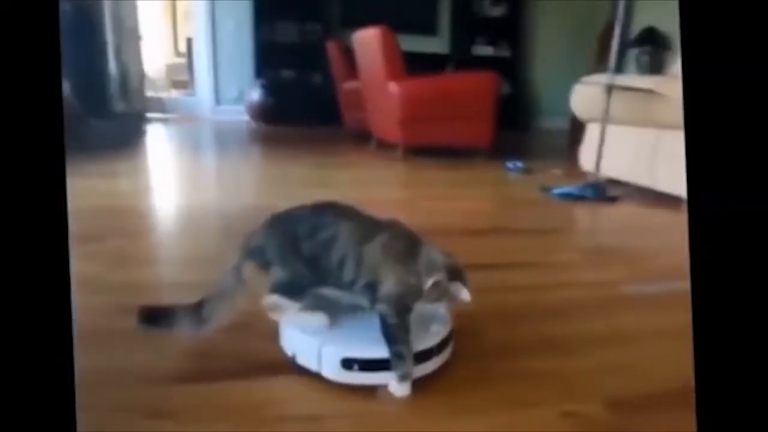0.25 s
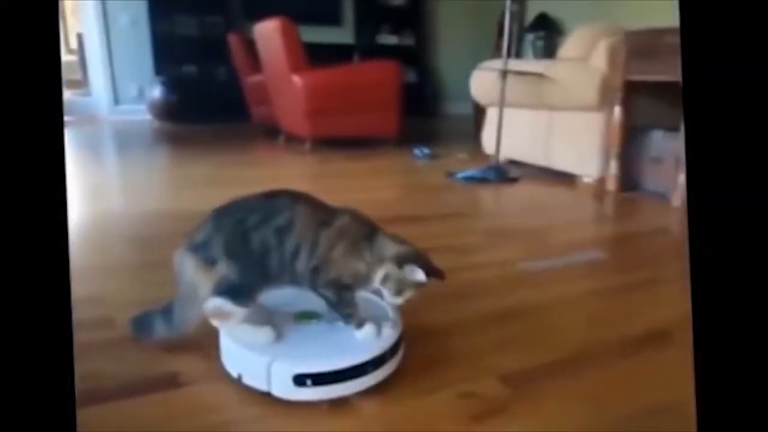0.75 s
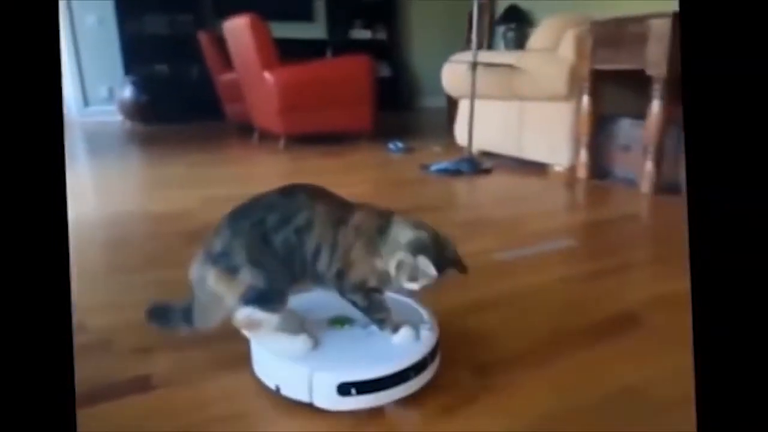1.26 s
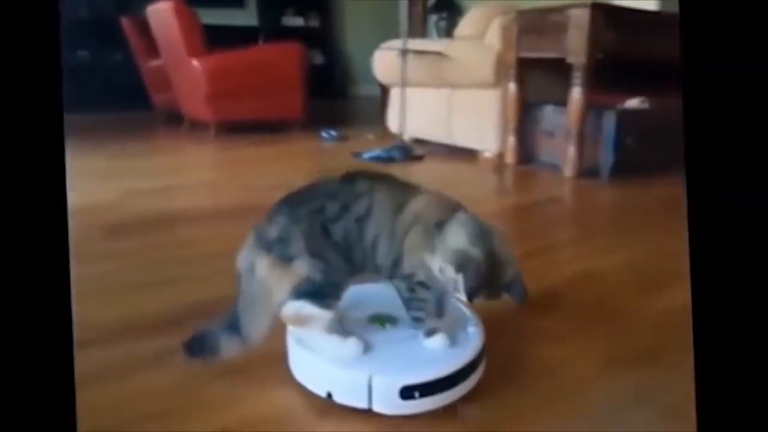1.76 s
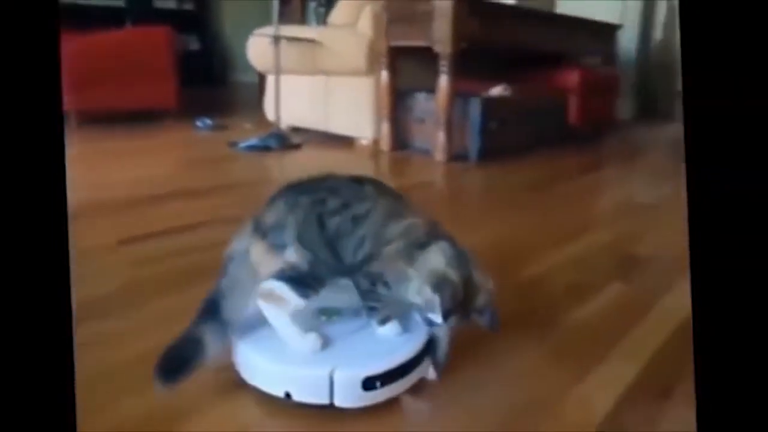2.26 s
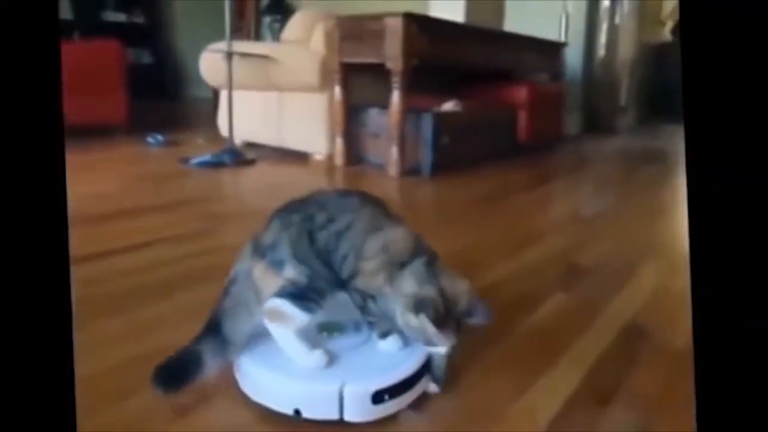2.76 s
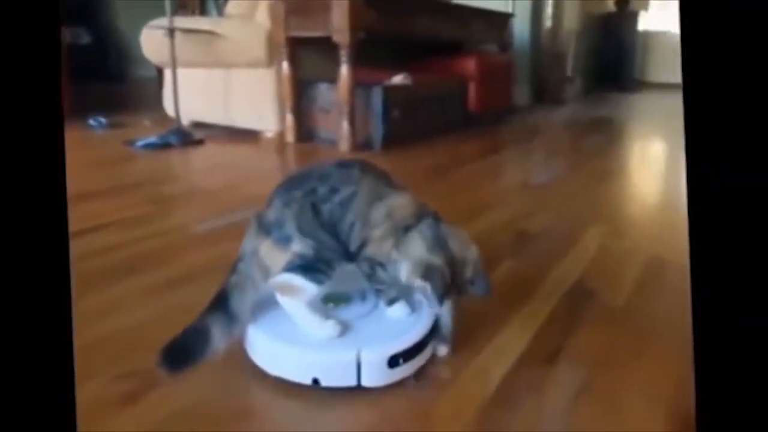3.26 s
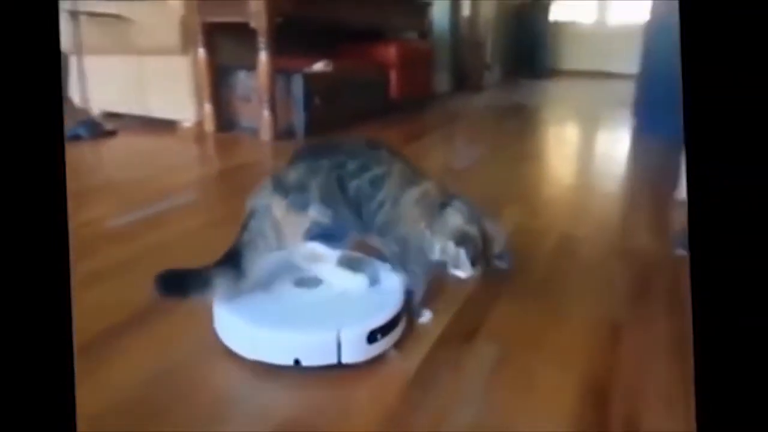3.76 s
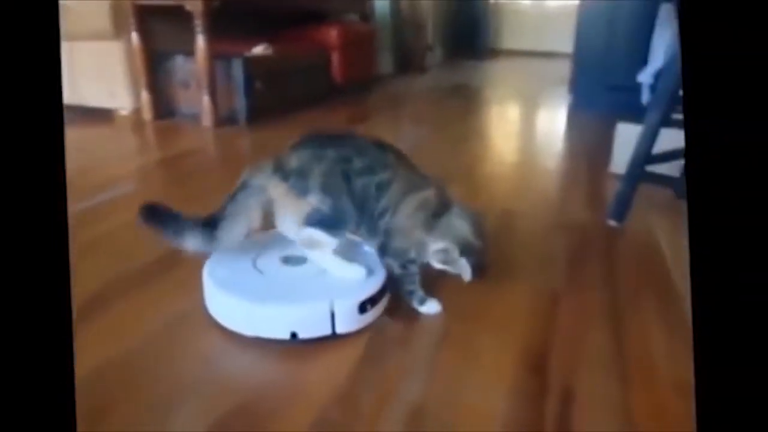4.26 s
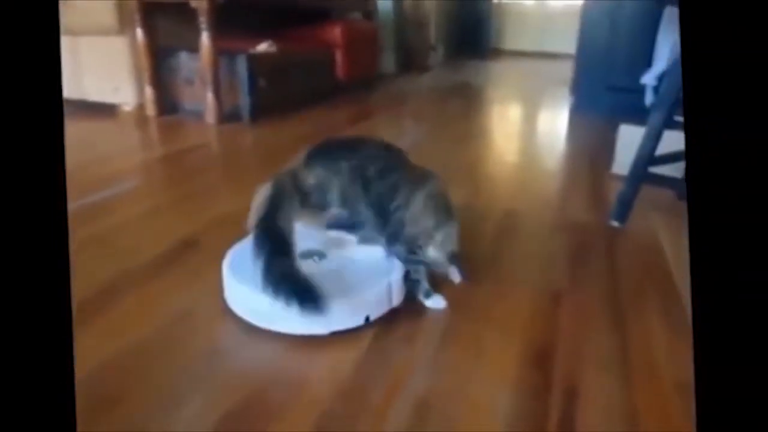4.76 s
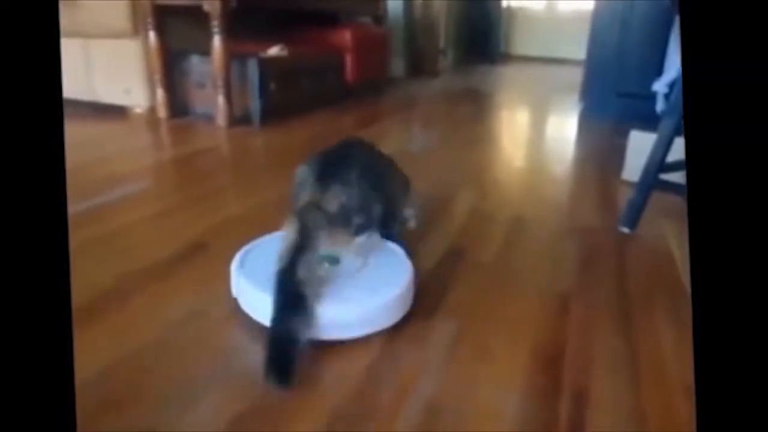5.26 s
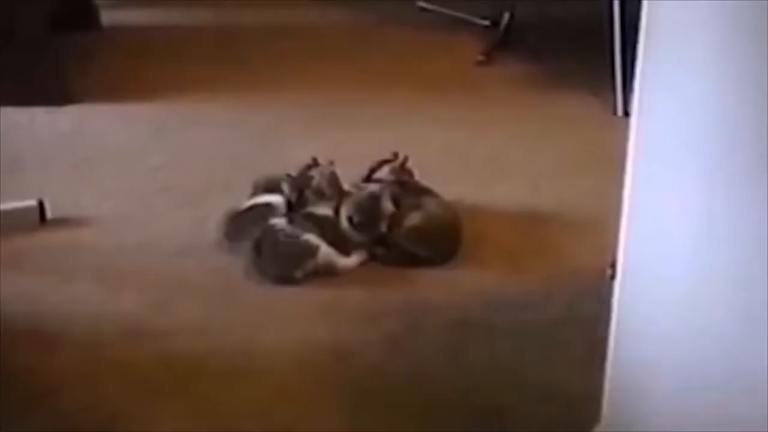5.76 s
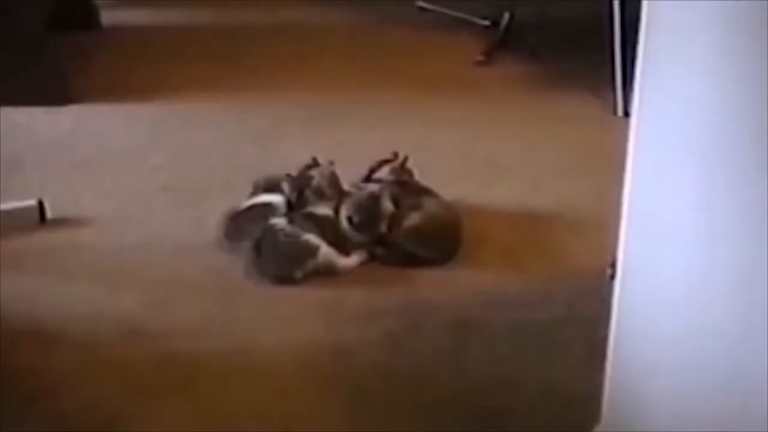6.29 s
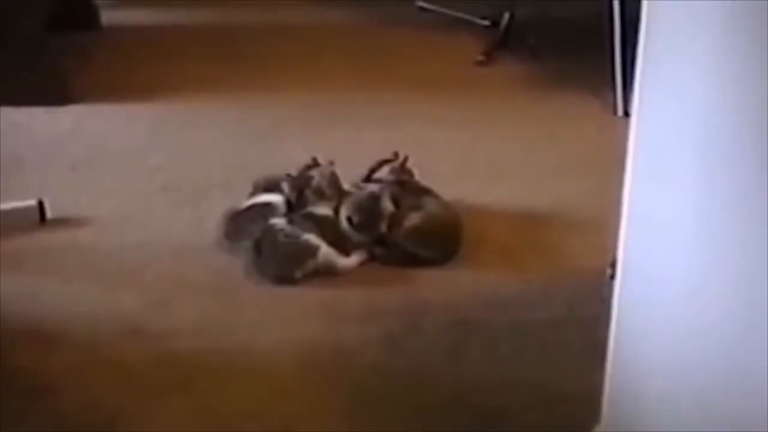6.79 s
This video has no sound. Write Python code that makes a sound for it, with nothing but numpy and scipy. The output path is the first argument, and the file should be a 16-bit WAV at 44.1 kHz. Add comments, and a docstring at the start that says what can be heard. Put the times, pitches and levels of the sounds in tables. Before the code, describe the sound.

A robot vacuum whirs close by on a wooden floor, its brush whining and rattling, nearly jamming, breaking free, then stopping dead into silence.

```python
"""A robot vacuum drives and turns on a wooden floor, close by: bladed-fan tone over turbulent air and wheel
rumble. From the start a geared brush motor sings and rattles, throbbing once per brush turn; shell knocks and
scuffs recur. Early and midway snags drag the brush down; near 4.8 s it slows almost to a jam, then breaks free
at 4.97 s. Five tiny skips occur along the way. Near 5.83 s the level dips briefly; at 6.12 s the sound stops,
leaving a settling offset over a faint electrical floor."""
import sys
import numpy as np
from scipy import signal
from scipy.fft import rfft, irfft, next_fast_len
from scipy.io import wavfile
from scipy.ndimage import uniform_filter1d, map_coordinates

SR = 44100
rng = np.random.default_rng(int(sys.argv[2]) if len(sys.argv) > 2 else 0)


def put_to_file(sound):
    """Save the sound as 16-bit audio at rate SR, in the file named by the first command-line argument."""
    columns = np.atleast_2d(sound).T  # one column per channel
    safe = np.clip(columns, -1, 1)
    whole_steps = np.round(safe * 32767)
    wavfile.write(sys.argv[1], SR, whole_steps.astype(np.int16))


N = 310106
T = np.arange(N) / SR  # time/s

BLADES = 7
# shaft speed of the suction fan: t/s, f/Hz
FAN_SHAFT_SPEED = [(0, 252), (.6, 254.7), (1.9, 254.5), (2.6, 252.3), (3.7, 253.3), (4.7, 252.7),
                   (5.2, 252.2), (6.1, 251.5)]
# blade tone, swelling and fading as the robot crosses the room's standing waves: t/s, level/dB
BLADE_TONE_LEVEL = [(0, -31.5), (.17, -32.5), (.55, -29.5), (.68, -38.5), (1.25, -42.5), (1.85, -38),
                    (2.4, -37.5), (2.62, -31.5), (3.5, -31), (4.03, -39), (4.25, -34), (4.8, -40.5),
                    (5.07, -35.5), (5.2, -44.5), (5.828, -42), (5.842, -31), (6.1, -30)]
# nodes of those waves, where the tone nearly vanishes: t/s, half length to 1/e /s, depth/dB
STANDING_WAVE_NODES = [(0, 0.065, 17), (.37, 0.052, 13.5), (1.33, 0.07, 15), (2.53, 0.052, 16)]
# the fan's other strong tones: t/s, hum level/dB, blade overtone level/dB
HUM_AND_OVERTONE = [(0, -45, -45.5), (1.1, -53, -71), (2.2, -58, -47.5), (3.6, -56, -49), (4.3, -52.5, -47),
                    (4.7, -50, -50), (5.2, -46, -48.5), (6.1, -46.5, -50.5)]
# faint lines from imbalance: multiple of the shaft rate, level/dB
IMBALANCE_LINES = [(3, -55), (4, -55), (5, -56), (6, -54.5), (8, -55.5)]


def fan(wobble=0.00045, flutter_db=0.92, line_flutter_db=1.5):
    """Blade-passing tone: seven blades sound at seven times the shaft rate; imbalance adds other multiples."""
    shaft_hz, = curves(FAN_SHAFT_SPEED)
    hum_db, overtone_db = curves(HUM_AND_OVERTONE)
    blade_db, = curves(BLADE_TONE_LEVEL)
    blade_db = blade_db - swells(STANDING_WAVE_NODES) + flutter_db * walk(34)
    angle = 2 * np.pi * np.cumsum(shaft_hz * (1 + wobble * walk(25))) / SR
    tones = undb(blade_db) * np.sin(BLADES * angle)
    tones += undb(hum_db) * np.sin(2 * angle)
    tones += undb(overtone_db + line_flutter_db * walk(2.5)) * np.sin(2 * BLADES * angle)
    for order, db in IMBALANCE_LINES:
        tones += undb(db + line_flutter_db * walk(2.9)) * np.sin(order * angle)
    return np.sqrt(2) * tones  # the levels are rms


# below this shaft speed the brush sticks and slips on the floor
STICK_HZ = 111
# a snag that takes more speed than this chokes the gear whine, by this many dB per further Hz
CHOKE_HZ, CHOKE_DB_PER_HZ = 3.5, 2.2
# gear whine: t/s, level/dB, throb with each brush turn/dB
WHINE_LEVEL = [(0, -37.5, 1), (.28, -38, -3), (.4, -40, 0), (.6, -40, -0.5), (1.15, -36, -1),
               (1.7, -38.5, 1.5), (2.15, -38, 0), (2.45, -47.5, 7), (3.2, -45.5, 2), (4.1, -47, 6),
               (4.68, -46, -4), (4.76, -37, -0.5), (4.88, -45.5, 4.5), (5.1, -52.5, 2), (5.35, -43.5, -1),
               (5.55, -70.5, 0.5)]
# whine of the 36-tooth gear with its sidebands: multiple of the shaft rate, relative level/dB
TOOTH_LINES = [(34, -9.5), (35, -14.5), (36, 3.5), (37, -13.5), (38, -13)]
# strength of the lower motor whirr: t/s, level/dB
WHIRR_LEVEL = [(0, -42), (3.8, -44), (4.7, -46.5), (5.2, -59), (6.1, -47.5)]
# lines of that whirr: multiple of the shaft rate, relative level/dB
MOTOR_LINES = [(9, -5), (15, -7.5), (18, -3.5), (27, -16), (28, -17)]
# gearbox resonances: f/Hz, nominal width/Hz (scaled in resonances), relative level/dB
GEARBOX_MODES = [(1648, 430, -3), (2003, 64, 2.5), (2724, 410, -7), (3223, 145, 3.5), (3583, 150, 1.5),
                 (3810, 360, 0.5), (4126, 150, -0.5)]


def brush_gear(rattle_db, jitter=.0011, sway=.0012, clatter=0.17, whine_flutter_db=0.87,
               rattle_snag_db=0.5, rattle_surge_db=0.23, whirr_load_db=0.4, room_share=0.28):
    """Gear meshing: teeth sing at multiples of the shaft rate; rattle is noise modulated once per shaft turn."""
    shaft_hz, turn = brush_motor()
    whine_db, throb_db = curves(WHINE_LEVEL)
    whirr_db, = curves(WHIRR_LEVEL)
    # bristle drag keeps the speed slightly uneven; a slowed brush judders
    judder_hz = .75 * np.clip((STICK_HZ - shaft_hz) / 4, 0, 1) * walk(45)
    uneven_hz = shaft_hz * (1 + jitter * walk(90) + sway * walk(18))
    angle = 2 * np.pi * np.cumsum(judder_hz + uneven_hz) / SR

    # slowed down the motor whirrs more; a snag turns song into rattle
    surge_hz = shaft_hz - uniform_filter1d(shaft_hz, SR // 5)
    snag_hz = swells(SPEED_SNAGS)
    choke_db = CHOKE_DB_PER_HZ * np.maximum(snag_hz - CHOKE_HZ, 0)
    whine_db = whine_db + throb_db * np.cos(turn) - choke_db + whine_flutter_db * walk(30)
    whine = undb(whine_db) * partials(TOOTH_LINES, angle)
    whirr = undb(whirr_db - whirr_load_db * surge_hz) * partials(MOTOR_LINES, angle)
    tonal = whine + whirr

    rattle_db = rattle_db + rattle_surge_db * surge_hz + rattle_snag_db * snag_hz
    rattle = noise(resonances(GEARBOX_MODES), band=(3620, 3900)) * undb(rattle_db)
    rattle *= 1 + clatter * np.cos(angle)
    return tonal + room_share * room(tonal) + rattle


# motor turns per brush turn; time/s at which the brush first runs lightest
BRUSH_RATIO, FREE_S = 20.95, .126
# motor speed, down to a near jam and free again: t/s, mean shaft f/Hz, swing per brush turn/Hz
BRUSH_SHAFT_SPEED = [(0, 111.2, 2.2), (.3, 112, 2.2), (.75, 111.9, 2.2), (2, 113, 2.2), (4.2, 114.2, 2.4),
                     (4.63, 113.6, 1.8), (4.75, 107.9, 1), (4.96, 101.3, 1), (4.975, 114, 2),
                     (5.2, 110.5, 1), (5.45, 114, 1)]
# the brush catches on the floor and drags the motor down: t/s, half length to 1/e /s, speed lost/Hz
SPEED_SNAGS = [(.437, .03, 8), (.59, .075, 5.2), (2.463, .15, 2.5), (2.883, .028, 2.8)]
# quick pick-up and slow sag: share of the swing's second harmonic, its lead/rad
SECOND_HARMONIC_SWING = (.23, .8)


def brush_motor():
    """Load modulation: the geared-down brush loads the motor once per turn, and snags slow both."""
    mean_hz, swing_hz = curves(BRUSH_SHAFT_SPEED)
    mean_hz = mean_hz - swells(SPEED_SNAGS)
    turn = 2 * np.pi * np.cumsum(mean_hz) / SR / BRUSH_RATIO
    turn = turn - np.interp(FREE_S, T, turn)
    share, lead = SECOND_HARMONIC_SWING
    swing = np.cos(turn) + share * np.cos(2 * turn + lead)
    return mean_hz + swing_hz * swing, turn


# rushing air: f/Hz, relative spectral level/dB
AIR_SPECTRUM = [(30, -24), (220, -21.5), (420, 7.5), (490, 5), (600, -1.5), (780, 6), (1050, 4.5),
                (1200, 4), (1550, 4), (2300, -1), (2750, -1), (3500, 3), (4200, 3), (4700, -5)]
# exhaust port resonances: f/Hz, nominal width/Hz (scaled in resonances), relative level/dB
EXHAUST_MODES = [(3066, 370, 1), (3764, 40, -9.5), (4654, 700, -1.5)]


def airflow(air_db, exhaust_db, gust_db=0.84):
    """Turbulence: broadband rush through the body, joined by noise shaped by the exhaust port's resonances."""
    rush = noise(slope(AIR_SPECTRUM), band=(1100, 1450))
    port = noise(resonances(EXHAUST_MODES), band=(2950, 3120))
    return (rush * undb(air_db) + port * undb(exhaust_db)) * undb(gust_db * walk(40))


WHEEL_DB = -58.5
# wheels on the boards: f/Hz, relative spectral level/dB
WHEEL_SPECTRUM = [(20, -11.5), (70, -11), (160, -4), (270, 4.5), (400, 1.5), (600, 1), (1200, -21.5)]
# brush well resonances: f/Hz, nominal width/Hz (scaled in resonances), relative level/dB
BRUSH_WELL_MODES = [(388, 52, -3), (919, 224, 4), (1062, 39, -1.5)]


def floor_contact(wheel_db, bristle_db, bump_db=-1.0, flick_db=0.5):
    """Rolling and brushing excitation: wheels rumble over boards, bristles flick in the resonant brush well."""
    rumble = noise(slope(WHEEL_SPECTRUM), band=(150, 340))
    sweep = noise(resonances(BRUSH_WELL_MODES), band=(860, 1080))
    rumble *= undb(wheel_db + bump_db * walk(50))
    sweep *= undb(bristle_db + flick_db * walk(60))
    return rumble + sweep


# scuffs over rough places in the boards: t/s, half length to 1/e /s, level/dB
SCUFF_EVENTS = [(.3, .12, -50), (1.278, 0.085, -53.5), (2.03, 0.15, -51.5), (2.78, 0.1, -43.5),
                (4.36, 0.14, -46)]
# colour of those scuffs: f/Hz, relative spectral level/dB
SCUFF_SPECTRUM = [(60, -16), (150, -6.5), (260, 6.5), (430, 2), (750, -2.5), (1300, -12), (3000, -26.5)]


def scuffs():
    """Sliding friction: short swells of coloured noise as the underside scrapes the floor."""
    scrape = noise(slope(SCUFF_SPECTRUM), band=(100, 1500))
    return scrape * swells([(s, half, undb(db)) for s, half, db in SCUFF_EVENTS])


# knocks of the shell: t/s, nominal level/dB (before doubling and damping), ring f/Hz
SHELL_KNOCKS = [(0.184, -14.5, 667), (0.374, -24.5, 499), (2.798, -27.5, 840), (4.898, -20, 637)]


def knocks(decay_s=0.00071, contact_s=0.00022):
    """Impact response: heavily damped sines of the plastic shell, with the onset softened by contact time."""
    out = np.zeros(N)
    for s, db, hz in SHELL_KNOCKS:
        age = np.clip(T - s, 0, 1)
        envelope = np.exp(-age / decay_s) - np.exp(-age / contact_s)
        out -= 2 * undb(db) * np.sin(2 * np.pi * hz * age) * envelope
    return out


def room(x, t60=0.12):
    """Diffuse reverberation: convolution with exponentially decaying noise of unit energy."""
    age = T[:SR // 2]
    tail = rng.standard_normal(len(age)) * np.exp(-np.log(1000) * age / t60)
    return signal.fftconvolve(x, tail / np.linalg.norm(tail))[:N]


def partials(lines, angle):
    """Rotational harmonics: uneven teeth make each multiple of the shaft rate tremble in strength and phase."""
    out = 0
    for order, db in lines:
        phase = order * angle + rng.uniform(0, 2 * np.pi)
        in_phase = (1 + .3 * walk(170)) * np.sin(phase)
        quadrature = .25 * walk(170) * np.cos(phase)
        out += undb(db) * (in_phase + quadrature)
    return np.sqrt(2) * out


def noise(gain_at, band):
    """Spectral shaping: white noise filtered by a gain function, with rms 1 inside the band/Hz."""
    size = next_fast_len(N)
    f = np.fft.rfftfreq(size, 1 / SR) + 1  # 1 Hz up, to avoid zero
    gain = gain_at(f)
    share = np.mean(gain ** 2 * (f > band[0]) * (f < band[1]))
    return irfft(rfft(rng.standard_normal(size)) * gain, size)[:N] / np.sqrt(share)


def slope(points):
    """Spectral envelope: gain through (f/Hz, level/dB) points, straight on a log-frequency axis."""
    hz, db = np.transpose(points)
    return lambda f: undb(np.interp(np.log(f), np.log(hz), db))


def resonances(modes):
    """Modal response: steep-sided resonances, summed in power."""
    def gain_at(f):
        power = 0
        for hz, width, db in modes:
            detuning = (f * f - hz * hz) / (f * width * 0.53)
            power = power + (undb(db) / (1 + detuning ** 2)) ** 2
        return np.sqrt(power)
    return gain_at


def swells(events):
    """Superposition: Gaussian rises, summed, from (t/s, half length to 1/e /s, height) rows."""
    return sum(height * np.exp(-((T - s) / half) ** 2) for s, half, height in events)


def walk(rate):
    """Low-passed randomness: smooth chance of spread 1 that changes about rate times a second."""
    f = np.fft.rfftfreq(N, 1 / SR)
    x = irfft(rfft(rng.standard_normal(N)) / (1 + (f / rate) ** 4), N)
    return x / x.std()


def curves(table):
    """Linear interpolation: a table's columns joined in time by straight lines."""
    s, *columns = np.transpose(table)
    return [np.interp(T, s, c) for c in columns]


def undb(db):
    """Logarithmic level: decibels to amplitude gain."""
    return 10 ** (np.asarray(db) / 20)


# the robot turns its gearbox and brush away and its exhaust toward the listener:
# t/s, gearbox rattle level/dB, exhaust level/dB, bristle level/dB, air level/dB
FACING_LEVELS = [(0, -46.5, -47.5, -47, -46.5), (.9, -45, -52, -44.5, -49), (1.8, -41, -49.5, -40, -48),
                 (2.8, -46.5, -49, -42, -47.5), (3.8, -46.5, -47, -45.5, -48),
                 (4.6, -49.5, -45, -48.5, -48), (5.3, -54, -48, -53.5, -46.5),
                 (6.1, -67.5, -44, -55.5, -47)]


def scene():
    """Superposition and directivity: one machine's sources add, their balance following its facing."""
    rattle_db, exhaust_db, bristle_db, air_db = curves(FACING_LEVELS)
    robot = fan() + brush_gear(rattle_db)
    robot += airflow(air_db, exhaust_db)
    robot += floor_contact(WHEEL_DB, bristle_db) + scuffs()
    shell = knocks()
    return (robot + shell + .55 * room(shell))[None]


MIC_TOP_HZ, CLOCK_HZ, TOP_HZ = 4490, 48000, 15650
STOP_S = 6.119
# moments at which the sound skips by a fraction of a millisecond: t/s
SKIP_TIMES = [.865, 1.88, 2.84, 3.805, 5.966]
# brief dip in level: start t/s, end t/s
DIP_SPAN = (5.829, 5.840)
# faint electrical floor: f/Hz, relative spectral level/dB
FLOOR_SPECTRUM = [(20, 30.5), (100, 18.5), (500, 11), (2000, 3), (6000, -4.5), (15000, -10)]


def record(dry, fade_s=0.02, floor_db=-107, offset_db=-51, settle_s=0.24):
    """Band-limiting and sampling: a narrow-band pickup whose uneven sample clock images sound into the treble."""
    # each skip loses 11 samples and makes the steady tones stumble
    kept = np.arange(N) + 11 * np.searchsorted(SKIP_TIMES, T)
    x = dry[0][np.minimum(kept, N - 1)]
    x = signal.sosfilt(signal.butter(16, MIC_TOP_HZ, fs=SR, output="sos"), x)
    # sampling at the last tick of another clock adds images spaced by the clocks' difference
    place = np.floor(T * CLOCK_HZ) * SR / CLOCK_HZ
    x = map_coordinates(x, [place], order=3, mode="nearest")
    x *= np.where((T > DIP_SPAN[0]) & (T < DIP_SPAN[1]), undb(-32), 1)
    x *= np.clip((STOP_S - T) / fade_s, 0, 1)
    # a small offset jumps in as the sound stops and settles away
    x += undb(offset_db) * (T > STOP_S) * np.exp(-np.abs(T - STOP_S) / settle_s)
    x += undb(floor_db) * noise(slope(FLOOR_SPECTRUM), band=(20, TOP_HZ))
    return signal.sosfilt(signal.ellip(10, .2, 80, TOP_HZ, fs=SR, output="sos"), x)[None]


dry = scene()
out = record(dry)
put_to_file(out)
```